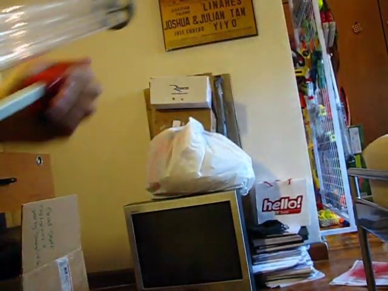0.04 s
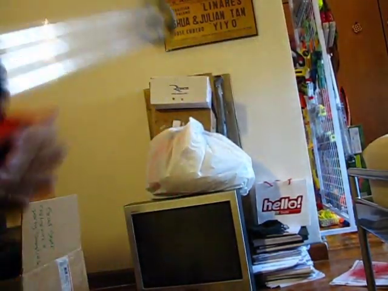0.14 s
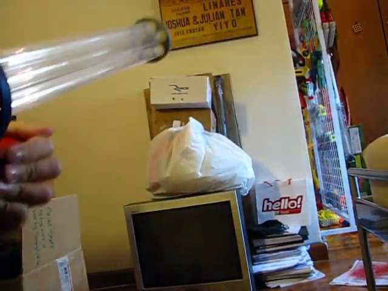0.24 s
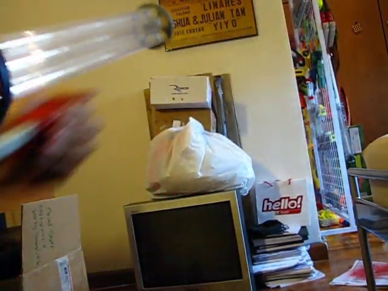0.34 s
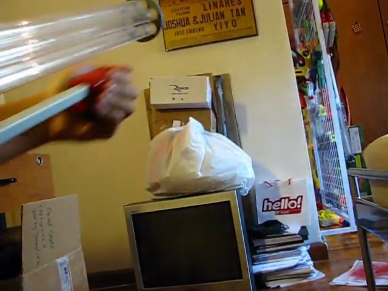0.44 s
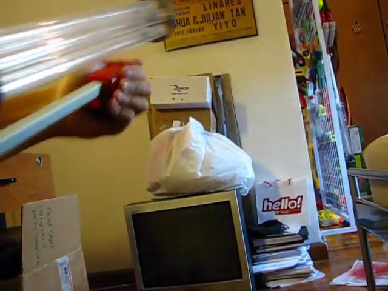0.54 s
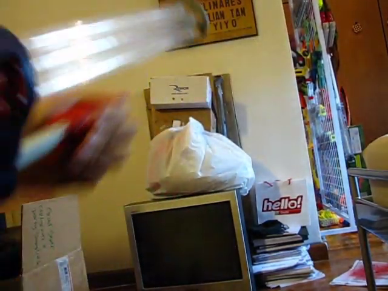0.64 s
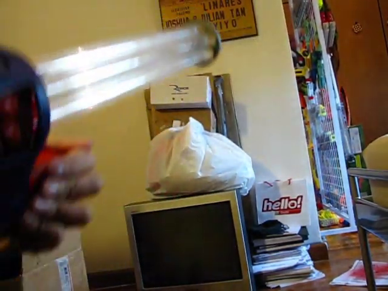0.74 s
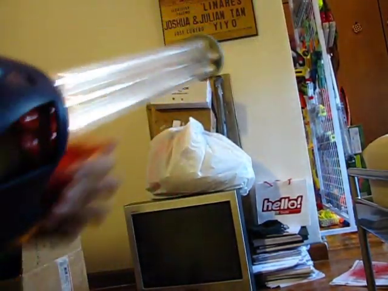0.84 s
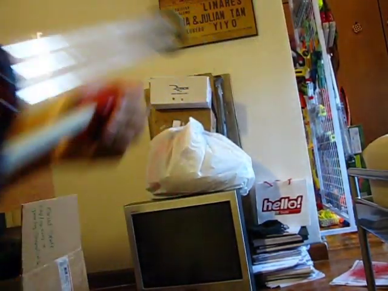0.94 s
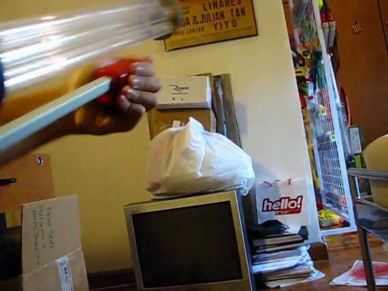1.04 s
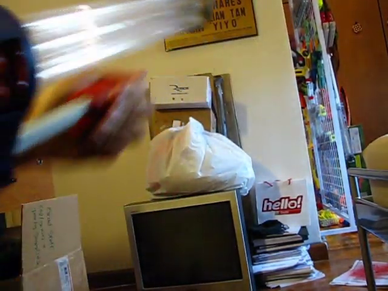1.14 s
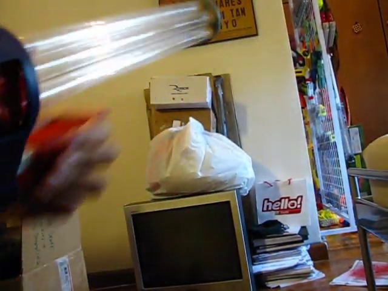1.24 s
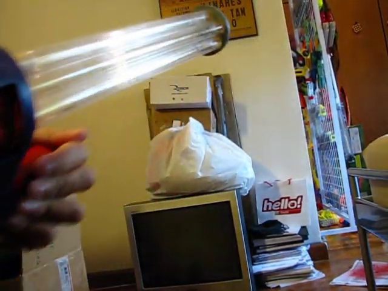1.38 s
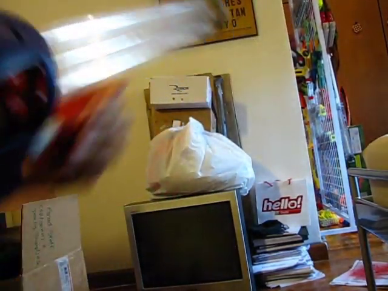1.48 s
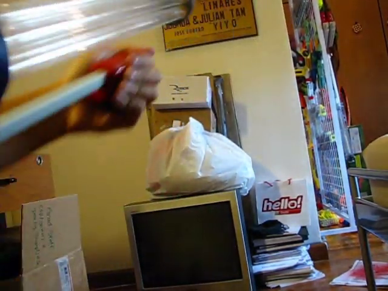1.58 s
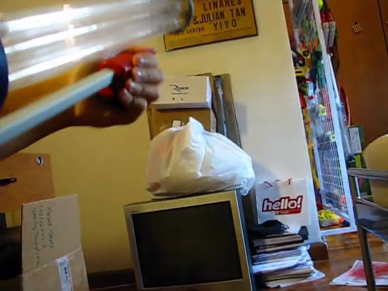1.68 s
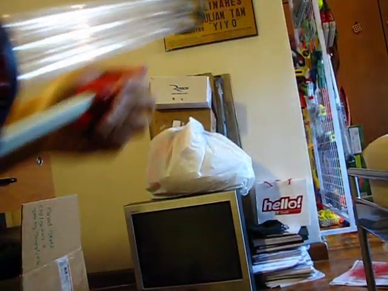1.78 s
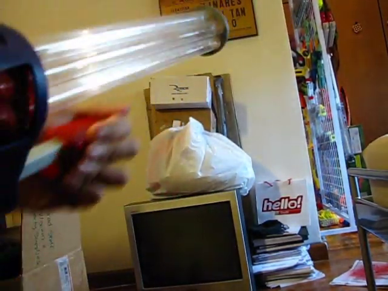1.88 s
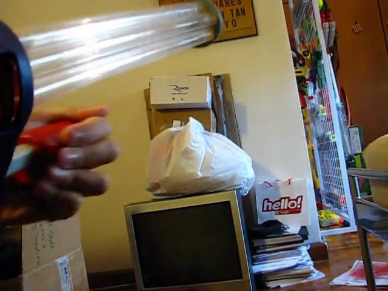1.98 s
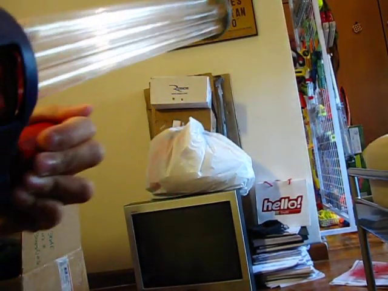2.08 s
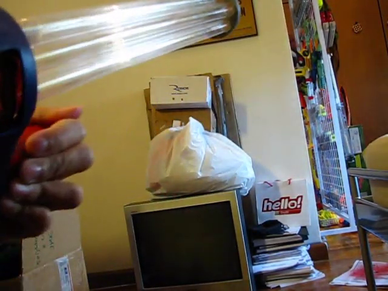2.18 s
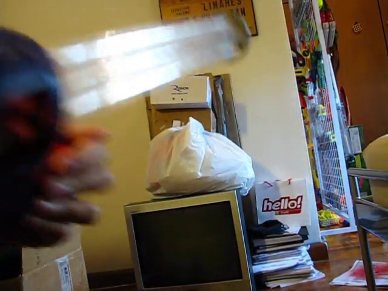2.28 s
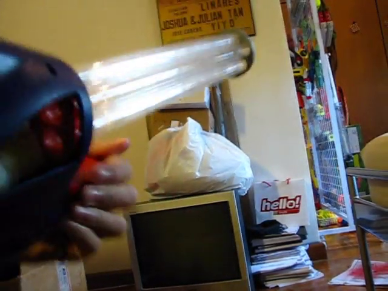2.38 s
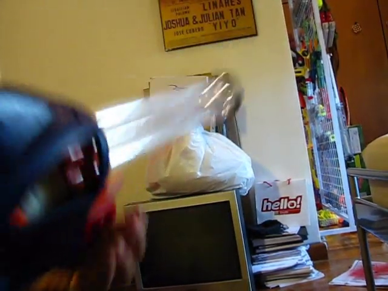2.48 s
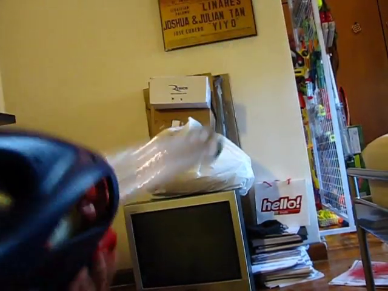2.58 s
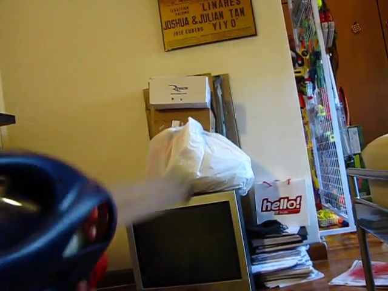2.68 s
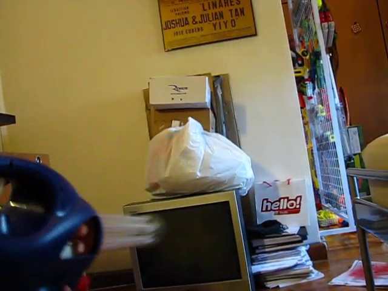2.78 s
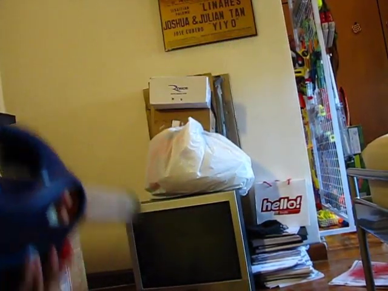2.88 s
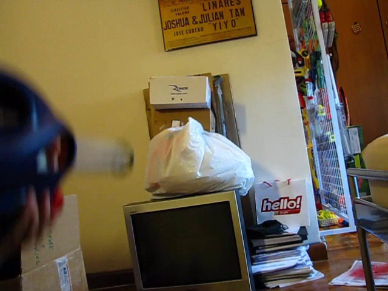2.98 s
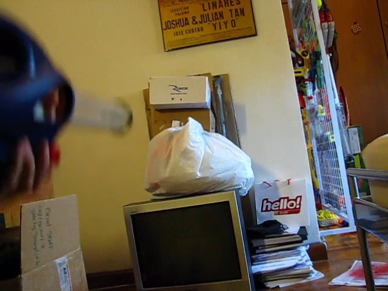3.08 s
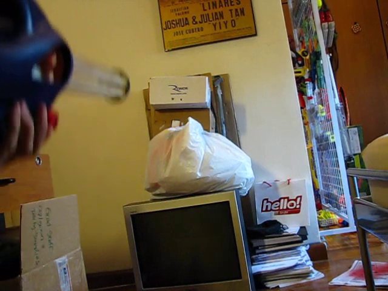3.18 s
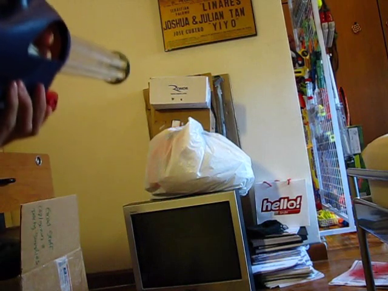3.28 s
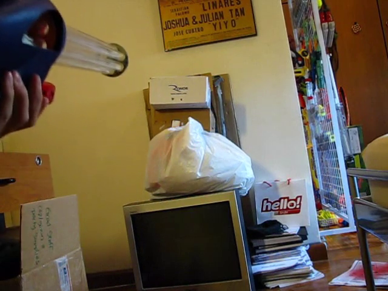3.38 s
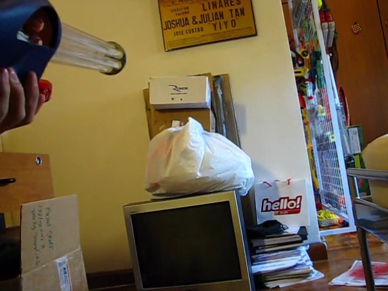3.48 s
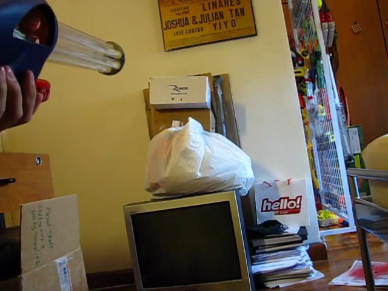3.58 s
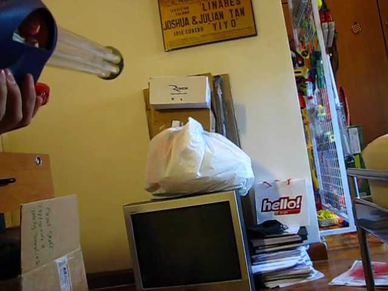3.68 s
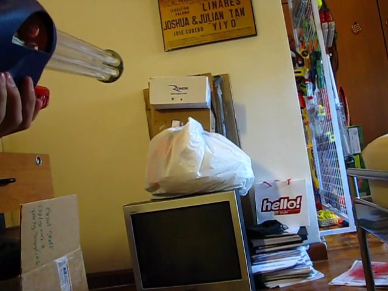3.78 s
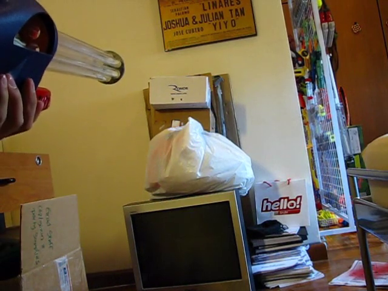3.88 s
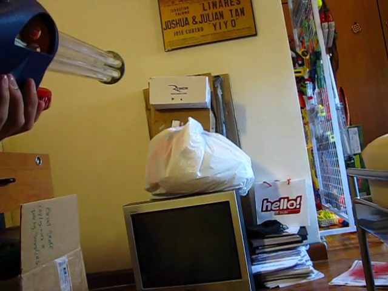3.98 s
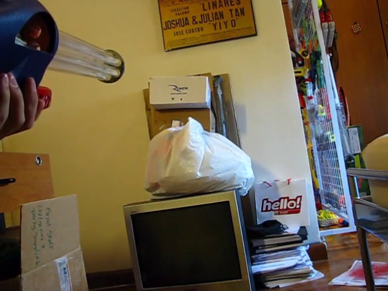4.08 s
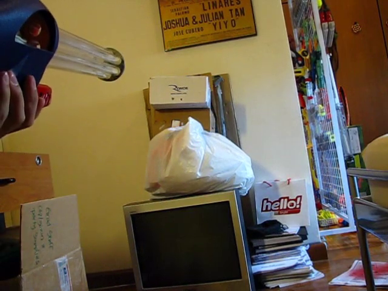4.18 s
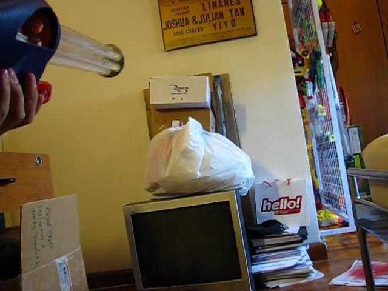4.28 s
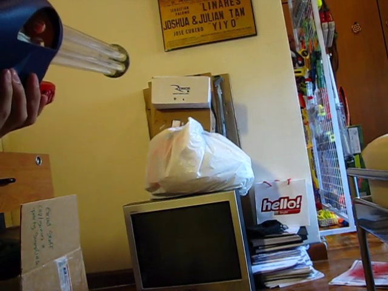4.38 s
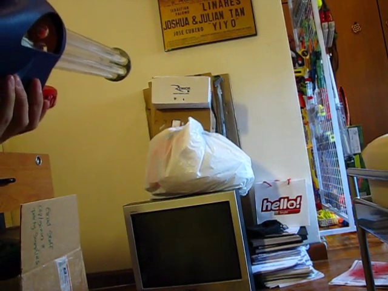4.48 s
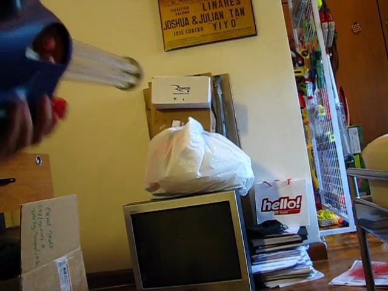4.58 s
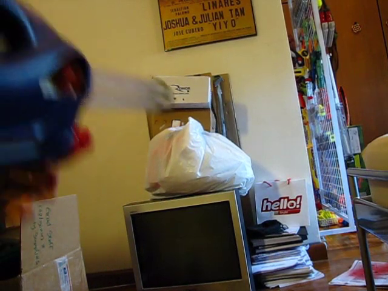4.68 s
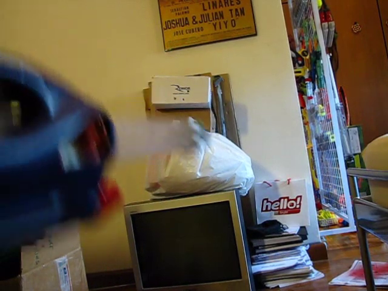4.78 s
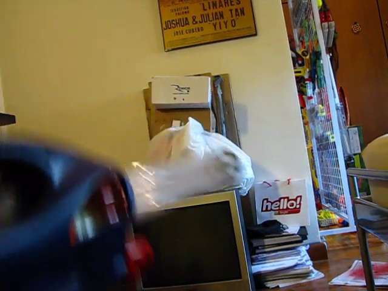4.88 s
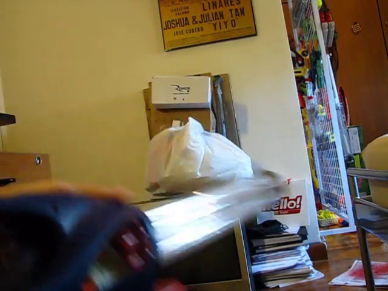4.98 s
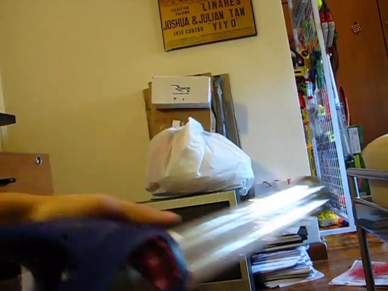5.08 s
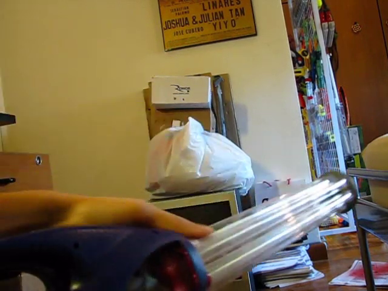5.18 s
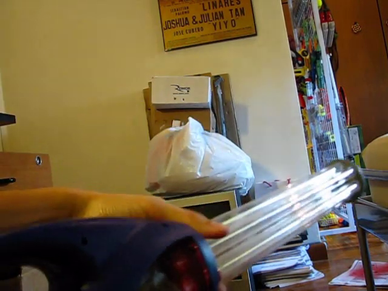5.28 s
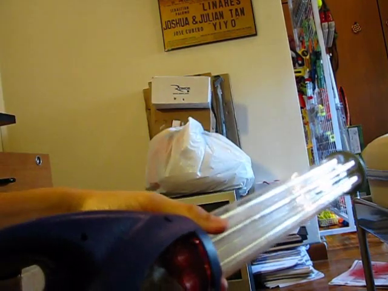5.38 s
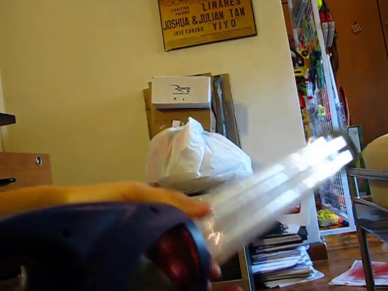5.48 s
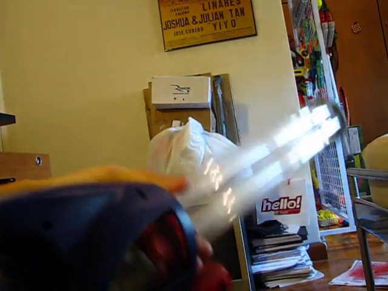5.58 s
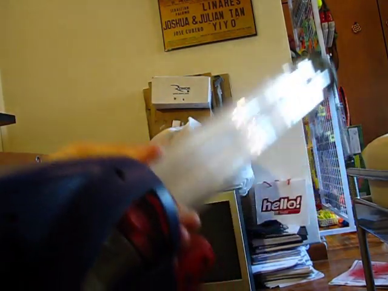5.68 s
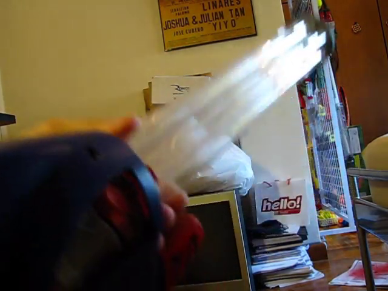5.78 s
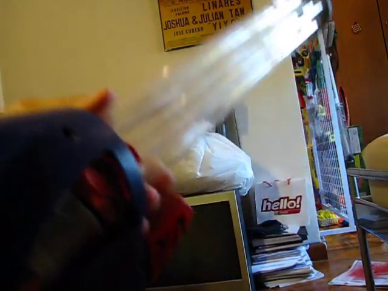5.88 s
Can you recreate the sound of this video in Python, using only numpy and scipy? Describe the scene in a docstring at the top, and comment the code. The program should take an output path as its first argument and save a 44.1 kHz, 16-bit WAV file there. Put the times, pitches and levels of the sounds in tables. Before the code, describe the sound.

In a small room with a low hum, quick strokes of a hand pump hiss, squeak and clack against the hollow plastic body of an air gun, close by and slightly left. Quieter taps and rustles follow as it is handled. The trigger clicks and the gun fires a loud pop with a brief room echo. After a few light clicks, a latch snaps shut with a faint ring from its spring.

```python
"""Plastic air blaster, pumped and fired

Close to a small stereo microphone the rod slides and hisses, the seal squeaks and the handle knocks at
the ends of its travel. After some handling the trigger lets the air go with a pop that fills the
cluttered room; a last latch snaps. A low room hum and hiss lie underneath."""
import sys
import numpy as np
from scipy import signal
from scipy.fft import rfft, irfft
from scipy.io import wavfile

SR = 44100
rng = np.random.default_rng(int(sys.argv[2]) if len(sys.argv) > 2 else 0)


def transcribe(signal):
    """Save signal, clipped to [-1, 1], as a 16-bit WAV file at the path in sys.argv[1]."""
    frames = np.atleast_2d(signal).T
    limited = np.clip(frames, -1, 1)
    pcm = np.round(limited * 32767).astype(np.int16)
    wavfile.write(sys.argv[1], SR, pcm)


N = 261938

# modes of the hollow shell and tubes: f/Hz, level/dB, t60/s
SHELL_MODES = [(370, -9.5, 0.056), (560, 14, 0.041), (675, 14.5, 0.015), (871, 19, 0.024),
               (1100, -10, 0.077)]


def amp(db):
    """dB to gain."""
    return 10 ** (np.asarray(db) / 20)


def rms_one(x):
    """Scale to rms 1."""
    return x / np.sqrt(np.mean(x ** 2) + 1e-20)


def in_time(curve):
    """Read a (time, value) curve at every sample."""
    return np.interp(np.arange(N) / SR, *np.transpose(curve))


def at_hz(points, hz):
    """Read a spectrum on a log-frequency axis."""
    freqs, values = np.transpose(points)
    return np.interp(np.log(hz + 1), np.log(freqs), values)


def colour(x, spectrum):
    """EQ a signal with a spectrum in dB."""
    size = x.shape[-1]
    return irfft(rfft(x) * amp(at_hz(spectrum, np.fft.rfftfreq(size, 1 / SR))), size)


def drift(rate_hz):
    """Smooth random wobble of rms 1."""
    r = np.exp(-2 * np.pi * rate_hz / SR)
    return rms_one(signal.lfilter([1], [1, -2 * r, r * r], rng.standard_normal(N + SR))[SR:])


def swell(s, length, change_db, rise, fade):
    """Envelope in dB: rise to 0 at s, slope over the length, fade; rise and fade in dB/s."""
    t = np.arange(N) / SR - s
    return rise * np.minimum(t, 0) + change_db * np.clip(t / length, 0, 1) - fade * np.maximum(t - length, 0)


def click(s, db):
    """A one-sample impulse at time s."""
    return amp(db) * (np.arange(N) == round(s * SR))


def ring(x, hz, t60):
    """Resonator: a unit click sets a sine of height 1 ringing."""
    r, w = amp(-60 / (t60 * SR)), 2 * np.pi * hz / SR
    return signal.lfilter([0, np.sin(w)], [1, -2 * r * np.cos(w), r * r], x + 1e-18)


def filtered(x, hz, kind, order=2):
    """Butterworth filter."""
    return signal.sosfilt(signal.butter(order, hz, kind, fs=SR, output="sos"), x)


def diffuse(size):
    """White stereo noise, alike in the bass and unrelated in the treble."""
    # diffuse field: f/Hz, left-right correlation
    likeness = [(60, 0.9), (180, 0.98), (550, 0.94), (1650, 0.62), (4970, 0.067), (15000, -0.088)]
    mid, side = rfft(rng.standard_normal((2, size)))
    alike = np.clip(at_hz(likeness, np.fft.rfftfreq(size, 1 / SR)), 0, 1)
    return irfft((np.sqrt(1 + alike) * mid + np.sqrt(1 - alike) * side * [[1], [-1]]) / np.sqrt(2), size)


def hiss_lift():
    """A patchy gain that raises the hiss throughout the pumping, then in brief handling rustles."""
    # lifts of the hiss: t/s, length/s, level/dB
    lifts = [(0.0, 2.13, -58), (3.4, 0.25, -70), (5.0, 0.17, -75), (5.52, 0.32, -66)]
    gain = sum(amp(db + swell(s, length, 0, rise=123.5, fade=32.5)) for s, length, db in lifts)
    return gain * amp(2.5 * drift(9))


def hum():
    """Low, gently wavering room hum."""
    # hum spectrum: f/Hz, level/dB
    spectrum = [(12, 7), (20, -22), (43, 6), (70, -11), (106, -2.5), (146, -16.5), (260, -8.5), (295, 2),
                (330, -6), (375, -1), (507, -28.5), (614, -10.5), (900, -42), (1170, -45.5), (1980, -120)]
    # level ride: t/s, level/dB
    ride = [(0, -58.5), (3.3, -59), (3.55, -53.5), (3.9, -54.5), (5.94, -58)]
    return rms_one(colour(diffuse(N), spectrum)) * amp(in_time(ride) + 0.82 * drift(4))


def hiss():
    """Room hiss with thin steady whines and a faint trill like far insects."""
    # hiss spectrum: f/Hz, level/dB
    spectrum = [(290, -31.5), (500, -3), (847, -9.5), (1290, -4), (2190, -7.5), (3990, -14), (4830, -10.5),
                (5430, -16), (7940, -20.5), (14700, -24), (16500, -60)]
    # whines: f/Hz, level/dB against the hiss
    tones = [(3410, -30), (7870, -31)]

    def narrow(x, hz, t60):
        return rms_one(ring(ring(x, hz, t60), hz, t60))

    throb = np.maximum(np.sin(2 * np.pi * 22.3 * np.arange(N) / SR), 0)
    trill = amp(-19) * narrow(diffuse(N) * throb, hz=4850, t60=.003)
    whines = sum(amp(db) * narrow(diffuse(N), hz, t60=.052) for hz, db in tones)
    return rms_one(colour(diffuse(N), spectrum)) + trill + whines


def background():
    """The bed of hum and hiss sinks after the loudest bangs and creeps back."""
    # dips: t/s, depth/dB
    dips = [(4.4, -11.5), (5.76, -16)]
    t, sink_s, recovery_db_per_s = np.arange(N) / SR, 0.11, 8.5
    dip_db = sum(np.interp(t, [s, s + sink_s, s + sink_s - db / recovery_db_per_s], [0, db, 0])
                 for s, db in dips)
    hiss_gain = amp(-64 + dip_db) + hiss_lift()
    return hum() * amp(dip_db) + hiss() * hiss_gain


def room(x):
    """Dense reflections build up, then die band by band; the tail has unit energy."""
    # reverb time: f/Hz, t60/s
    decay = [(60, 0.45), (250, 0.39), (1000, 0.47), (5000, 0.47), (8000, 0.44), (13000, 0.27)]
    t, edges = np.arange(SR * 3 // 4) / SR, np.geomspace(30, 18000, 15)
    noise, tail, build_s = diffuse(len(t)), 0, .00057
    for k, (low, high) in enumerate(zip(edges, edges[1:])):
        band = (-1) ** k * filtered(noise, [low, high], "band")
        tail += band * amp(-60 * t / at_hz(decay, np.sqrt(low * high)))
    tail *= 1 - np.exp(-t / build_s)
    return signal.fftconvolve(x[None], rms_one(tail) / np.sqrt(len(t)), axes=1)[:, :N]


def close_mic(left, right):
    """The right channel lags slightly in the bass and stays a quarter turn behind in the treble."""
    lag_samples = 5
    turn = np.minimum(2 * np.pi * np.fft.rfftfreq(N) * lag_samples, np.pi / 2)
    return np.array([left, irfft(rfft(right) * np.exp(-1j * turn), N)])


def thumps():
    """Dull, damped swings carried through the furniture."""
    # thumps: t/s, peak/dB, f/Hz, t60/s
    swings = [(0.981, -46.5, 132, 0.14), (1.52, -34, 365, 0.066), (2.396, -39, 148, 0.27),
              (2.401, -37, 74, 0.56), (4.342, -18, 720, 0.018), (4.347, -12.5, 95, 0.026),
              (4.347, -35.5, 324.4, 0.018)]
    return sum(ring(click(s, db), hz, t60) for s, db, hz, t60 in swings)


def latch_spring():
    """The spring sings after the last snap."""
    return ring(click(s=5.752, db=-39), hz=2600, t60=.42)


def rod_slide():
    """Grainy friction rumbles in the shell and rubs in the mids; air hisses past the seal."""
    # strokes: t/s at full speed, length/s, shell/dB, rub/dB, air/dB, friction change/dB, air change/dB
    strokes = [(0.0, 0.029, -54, -50.5, -47.5, 8.5, -6), (0.148, 0.1, -43, -39, -39, 1.5, -3.5),
               (0.431, 0.1, -54, -41, -48.5, -7, -3.5), (0.659, 0.15, -54.5, -49, -44.5, 6, -1),
               (0.967, 0.11, -45, -38, -42.5, -6.8, -5.5), (1.202, 0.065, -49, -42.5, -41.5, -4.5, -4),
               (1.349, 0.089, -43, -40, -41, -6.5, -14), (1.512, 0.17, -52, -44.5, -51.5, -1.2, 3),
               (1.833, 0.098, -52.5, -47.5, -47, 2, 0), (2.069, 0.13, -61, -59.5, -57, 14.5, 8.5),
               (2.284, 0.06, -54.5, -43, -54.5, -11.5, -4), (2.407, 0.046, -53.5, -47.5, -64, -3.5, 8)]
    # rubbing spectrum: f/Hz, level/dB
    rub_spectrum = [(590, -41), (1000, -28), (1310, -9.5), (1670, 2.5), (2290, -1), (2530, 4.5), (2910, -2),
                    (3500, 0), (5220, -11), (7000, -46), (9100, -45), (15400, -120)]
    # leaking air spectrum: f/Hz, level/dB
    air_spectrum = [(2350, -30.5), (4000, -14), (5200, -4.5), (5850, -5), (6500, -12), (9000, -13.5),
                    (13700, -17), (15600, -25), (16500, -48)]
    shell_gain, rub_gain, air_gain = np.zeros((3, N))
    for s, length, shell_db, rub_db, air_db, friction_change, air_change in strokes:
        friction_db = swell(s, length, friction_change, rise=299, fade=195.5)
        shell_gain += amp(shell_db + friction_db)
        rub_gain += amp(rub_db + friction_db)
        air_gain += amp(air_db + swell(s, length, air_change, rise=399, fade=297))
    grains = rng.standard_normal((2, N)) * amp(1.8 * drift(50) + 1.5 * drift(400))
    modes = sum(amp(db) * ring(grains[0], hz, 0.52 * t60) for hz, db, t60 in SHELL_MODES)
    shell = np.diff(modes * amp(4.1 * drift(10.8)), prepend=0)
    rub = colour(grains[1], rub_spectrum)
    air = colour(rng.standard_normal(N) * amp(1.2 * drift(60)), air_spectrum)
    return shell_gain * rms_one(shell) + rub_gain * rms_one(rub) + air_gain * rms_one(air)


def seal_squeaks():
    """Regular slips of the seal give a stack of overtones that rises as the pressure builds."""
    # squeaks: t/s, length/s, start f/Hz, climb/(Hz/s), last surge/Hz, level/dB,
    # time to peak/s, slope around the peak/(dB/s), overtone tilt/(dB/octave)
    squeaks = [(.146, .044, 1370, 17300, 0, -20, .024, 800, 0.5),
               (.186, .072, 1168, 1500, 5, -40, .045, 20, -4),
               (.735, .105, 1205, 500, 152, -41, .07, 30, 0.1),
               (1.295, .095, 1190, 1180, 3, -40, .06, 110, -4),
               (2.064, .166, 1400, 450, 205, -44, .036, 95, 2)]
    # tone colour of the seal: f/Hz, level/dB
    spectrum = [(2000, 0), (2600, -6), (3600, -15), (5500, -8), (7000, -19), (9000, -22), (10800, -15),
                (13000, -24), (16000, -34)]
    overtone_lag_s, fade_s = 0.0045, 0.0051
    out, flicker_db = np.zeros(N), [2.5 * (k > 1) * drift(40) for k in range(12)]
    for s, length, start_hz, climb, surge, level_db, to_peak, slope, tilt in squeaks:
        t = np.clip(np.arange(N) / SR - s, 0, length)
        hz = start_hz + climb * t + surge * (t / length) ** 4
        phase = 2 * np.pi * np.cumsum(hz * (1 + .002 * drift(150))) / SR
        stack = 0
        for k in range(1, 12):   # each higher overtone sets in later and wavers on its own
            gain = amp(at_hz(spectrum, k * hz) + tilt * np.log2(k) + flicker_db[k])
            gate = np.clip(np.minimum(t - overtone_lag_s * (k - 1), length - t) / fade_s, 0, 1)
            stack += gain * gate * np.sin(k * phase) * (k * hz < SR / 2)
        out += np.sqrt(2) * amp(level_db - slope * abs(t - to_peak) + 1.2 * drift(90)) * stack
    return out


def shell_hit(contact, crack, levels_db, edge_hz, body_hz):
    """Four layers of a knock: the shell rings, an edge snaps, the crack adds bite and treble."""
    body = sum(amp(db - 10 * abs(np.log2(hz / body_hz))) * ring(contact, hz, t60)
               for hz, db, t60 in SHELL_MODES)
    edge = contact + amp(-16) * ring(contact, edge_hz, t60=14 / edge_hz)
    layers = np.array([filtered(body, 400, "high", order=3),   # a small shell radiates no bass
                       filtered(edge, [1200, 3300], "band"),
                       -filtered(crack, [3300, 7000], "band"),
                       filtered(crack, 7000, "high")])
    return amp(levels_db)[:, None] * layers / np.abs(layers).max(1, keepdims=True)


def knocks():
    """Short rough contacts on the plastic shell; returns direct stereo and the room send."""
    # knocks: t/s, body/dB, edge/dB, bite/dB, treble/dB, edge f/Hz, most struck shell f/Hz, send/dB
    hits = [(0.022, -19.5, -10.5, -21.5, -27, 2280, 603, -19.5),
            (0.253, -13, -14, -16.5, -22, 2220, 620, -19), (0.321, -32.5, -32.5, -40, -51, 1490, 864, -16),
            (0.419, -38, -31.5, -43, -55, 2450, 1180, -19), (0.564, -31.5, -32, -31.5, -28, 1920, 600, -10),
            (0.585, -31, -19.5, -34.5, -41, 2320, 522, -14),
            (0.692, -30.5, -34.5, -36.5, -45, 2320, 560, -4), (0.81, -29, -23, -20, -24, 1415, 530, -13),
            (0.981, -35, -29, -41, -46, 2540, 864, -4), (1.153, -40, -41, -57, -49, 1450, 568, -15),
            (1.223, -28.5, -29.5, -43, -48, 2200, 596, -12.5), (1.293, -32, -28, -42, -51, 2460, 1200, -11),
            (1.359, -28.5, -20.5, -17, -13, 1470, 886, -14.5),
            (1.419, -68, -21.5, -21.5, -15, 2900, 853, -17), (1.483, -36, -26, -27.5, -22, 3300, 888, -27),
            (1.492, -37.5, -36, -42, -22, 1770, 575, -33),
            (1.518, -33, -28.5, -24.5, -18.5, 2030, 636, -24),
            (1.555, -32, -32.5, -24.5, -23, 1310, 864, -4), (1.736, -29, -14, -36, -64, 2180, 1160, -16),
            (1.742, -32, -49, -50, -64, 1660, 530, -16), (1.863, -29.5, -38.5, -45, -48, 2380, 560, -8.5),
            (1.997, -41.5, -31, -29, -28.5, 2260, 1080, -10), (2.012, -32, -29, -50, -56, 2200, 533, -27),
            (2.182, -27.5, -33, -34, -40, 1740, 1000, -21), (2.187, -35, -32, -52, -46, 1530, 554, -17),
            (2.227, -30, -23, -35, -28, 2600, 593, -31), (2.257, -30.5, -19, -14, -12, 2080, 1100, -16),
            (2.315, -44, -40, -44, -51, 1290, 549, -11), (2.343, -43, -56, -43, -42.5, 1960, 546, -14),
            (2.364, -65, -40, -34, -48, 2580, 544, -12),
            (2.386, -28.5, -19.5, -22.5, -18.5, 2130, 870, -15.5),
            (2.449, -33.5, -36.5, -37, -53, 1870, 600, -12.5), (2.528, -43, -60, -48.5, -40, 1830, 575, -6),
            (2.748, -43.5, -40.5, -37.5, -46, 1400, 996.6, -3),
            (2.833, -50, -48.5, -50, -47.5, 2670, 816.4, -11), (3.245, -49, -51, -63, -69, 1440, 587, -17),
            (3.292, -50, -45, -37.5, -45, 2650, 614, -8), (3.393, -32.5, -29.5, -26, -67, 3100, 1040, -7.5),
            (3.47, -43.5, -44, -62, -66, 1900, 519, -4), (3.525, -30, -51, -53, -61, 1390, 541, -15),
            (3.547, -35, -42, -57, -58, 2200, 850, -2.5), (3.614, -25.5, -31, -65, -43.5, 1220, 875, -11.5),
            (4.249, -43, -41.5, -52, -62, 1360, 533, -3), (4.305, -19.5, -24, -34, -39.5, 1180, 869, -7.5),
            (4.324, -43, -32.5, -34, -35, 2310, 856, -6.5), (4.345, -23.5, -3, -12, -19, 2800, 608, -11.5),
            (4.861, -53, -54, -44, -63, 2300, 571, -7), (5.517, -46, -46, -51, -58, 1660, 547, -1),
            (5.531, -34.5, -38.5, -35.5, -51, 2440, 830, -6.5),
            (5.679, -47.5, -36, -27, -38, 1870, 487, -5), (5.707, -52, -47, -48, -50, 1930, 541, 4),
            (5.747, -18.5, -6.5, -2.5, -16.5, 2740, 880, -18.5)]
    # the blaster moves from the left to the front: t/s, treble left over right/dB
    place = [(0, 6), (2.5, 3), (4.3, 4), (5.0, -0.5), (5.5, 0.5), (5.94, -0.3)]
    rise_s, contact_s, crack_s = .0008, .002, .0012
    t, out, pan_db = np.arange(SR // 6) / SR, np.zeros((3, N + SR)), in_time(place)
    impulse = 1. * (t == 0)
    pan_share = np.array([.3, .6, 1, 1])   # the treble is more directional than the shell tones
    for s, *levels_db, edge_hz, body_hz, send_db in hits:
        start, voicing = round(s * SR), (levels_db, edge_hz, body_hz)
        rough = rng.standard_normal(len(t)) * (1 - np.exp(-t / rise_s))
        direct = shell_hit(rough * np.exp(-t / contact_s), rough * np.exp(-t / crack_s), *voicing)
        # the room averages all directions and gets a plain click of the same energy
        plain = shell_hit(impulse, impulse, *voicing)
        plain *= (np.linalg.norm(direct, axis=1) / np.linalg.norm(plain, axis=1))[:, None]
        sides = amp(np.outer([.5, -.5], pan_share * pan_db[start])) @ direct
        out[:, start:start + len(t)] += [*sides, amp(send_db) * plain.sum(0)]
    return out[:2, :N], out[2, :N]


def shot():
    """Puffs of turbulent air; returns the direct pop and the plain pulses sent to the room."""
    # muzzle pop and its slap on the far wall: t/s, direct/dB, send/dB, decay/ms
    bursts = [(4.346, -11.5, 17.5, 9.4), (4.368, -20.5, 31.5, 7.7)]
    # blast spectrum: f/Hz, level/dB
    spectrum = [(35, -62), (60, -30), (208, -9.5), (334, -4), (534, -12), (586, -4), (724, -12),
                (3670, -11.5), (15000, -28), (16500, -54.5)]
    t, noise = np.arange(N) / SR, rms_one(colour(rng.standard_normal(N), spectrum))
    envelope = sum(amp(db) * (t >= s) * np.exp(-1000 * np.maximum(t - s, 0) / ms)
                   for s, db, _, ms in bursts)
    pulses = sum(click(s, db) for s, _, db, _ in bursts)
    return noise * envelope, colour(pulses, spectrum)


def scene():
    """Close sources with a little room, the pop with much of it."""
    hits, hit_send = knocks()
    pump = rod_slide() + seal_squeaks()
    pop, pop_send = shot()
    direct = pump * amp([[1.2], [-1.2]]) + thumps() + latch_spring() + pop + hits
    wet = room(hit_send + amp(-17.5) * pump + pop_send)
    return close_mic(*direct) + wet + background()


def record(dry):
    """The loudest peaks are rounded, the top is cut steeply."""
    rounded = .8 * np.tanh(dry / .8)
    return signal.sosfilt(signal.cheby2(10, 60, 17000, fs=SR, output="sos"), rounded)


dry = scene()
out = record(dry)
transcribe(out)
```